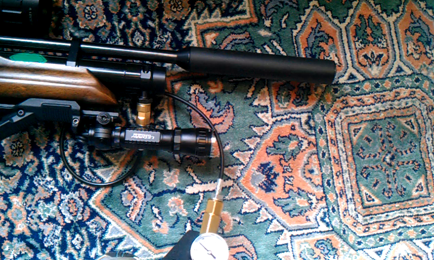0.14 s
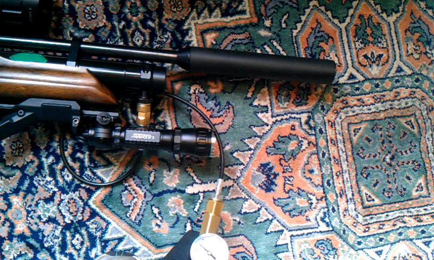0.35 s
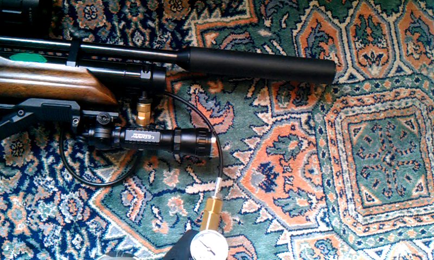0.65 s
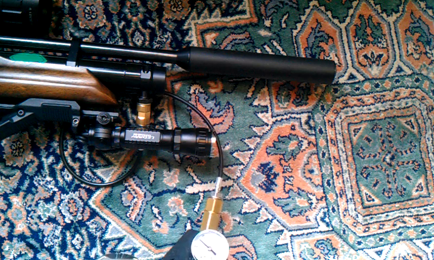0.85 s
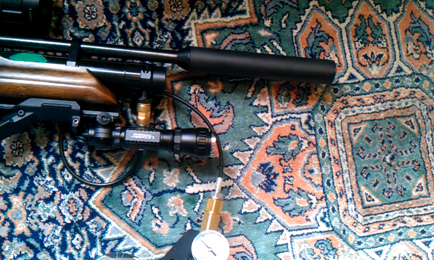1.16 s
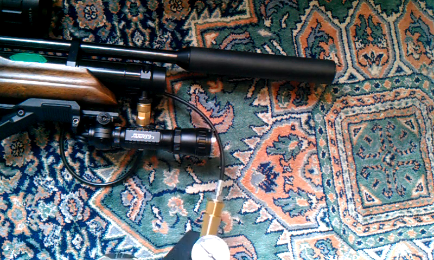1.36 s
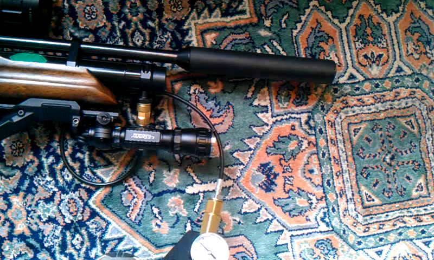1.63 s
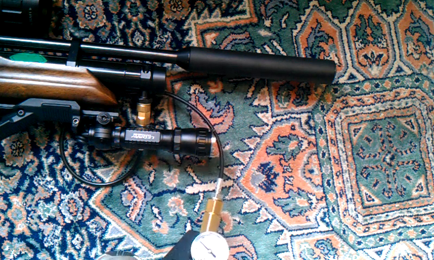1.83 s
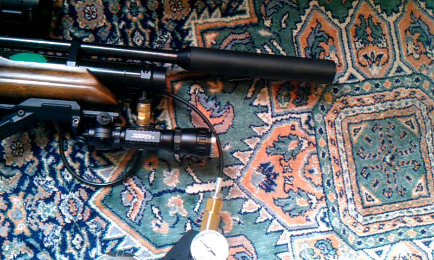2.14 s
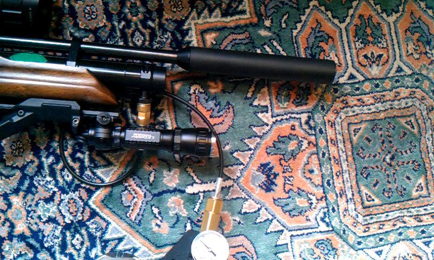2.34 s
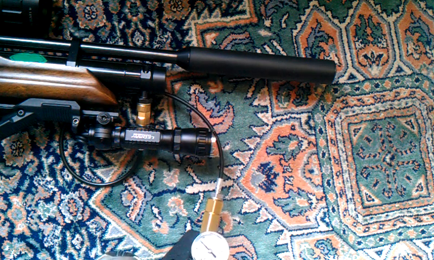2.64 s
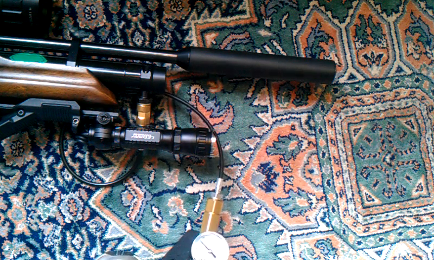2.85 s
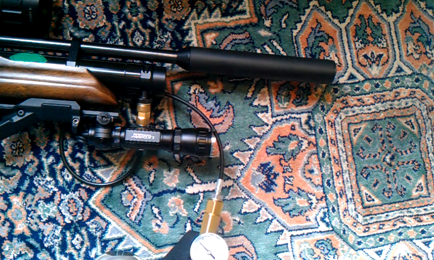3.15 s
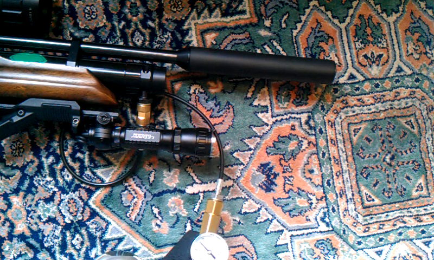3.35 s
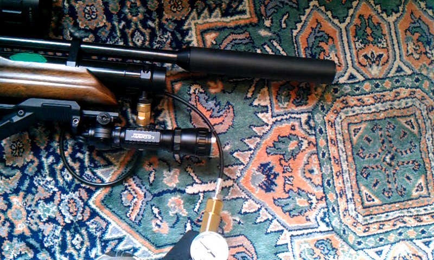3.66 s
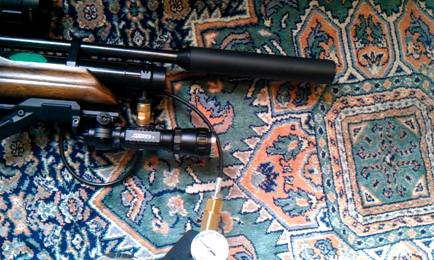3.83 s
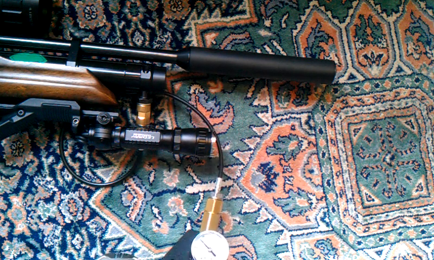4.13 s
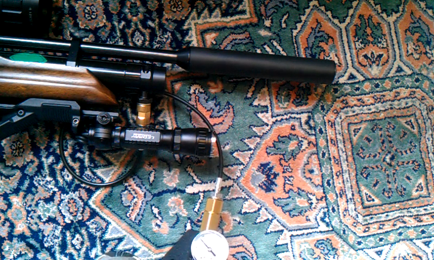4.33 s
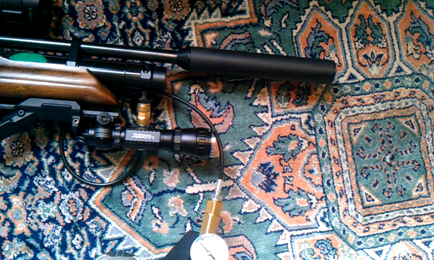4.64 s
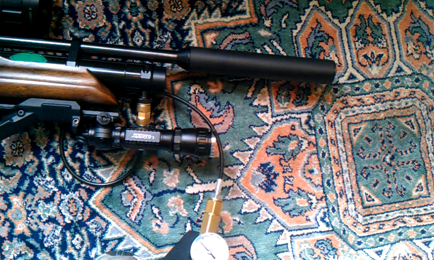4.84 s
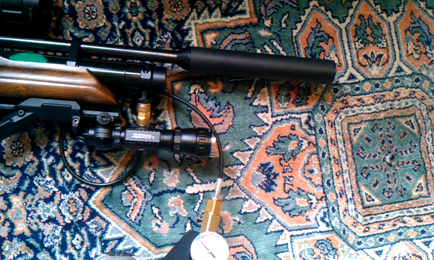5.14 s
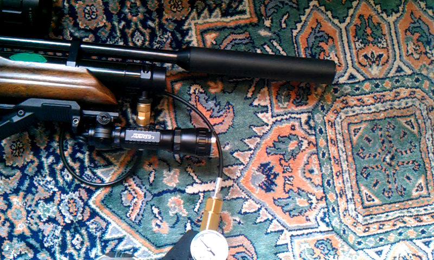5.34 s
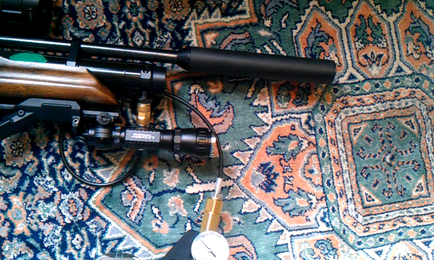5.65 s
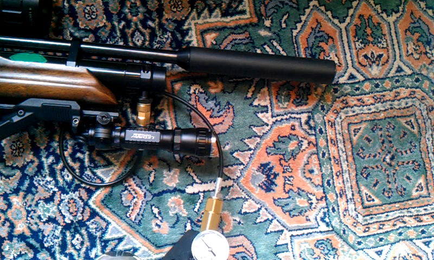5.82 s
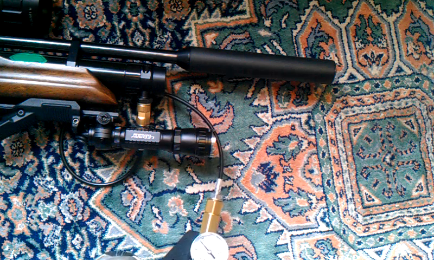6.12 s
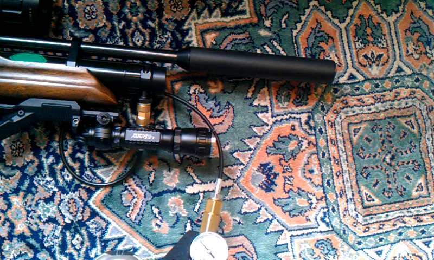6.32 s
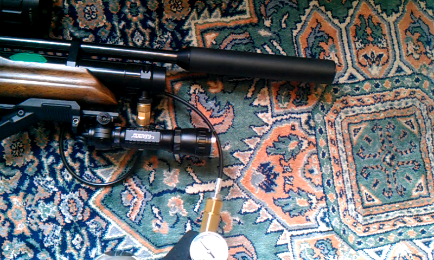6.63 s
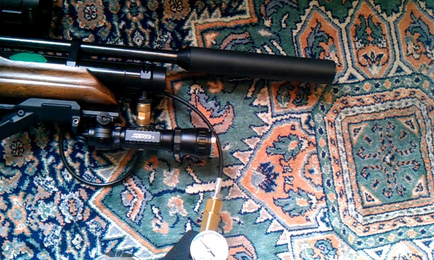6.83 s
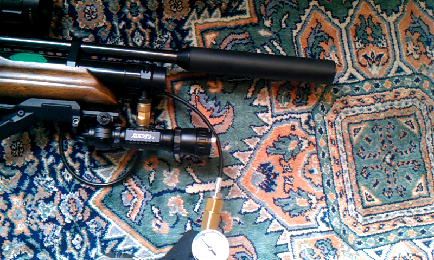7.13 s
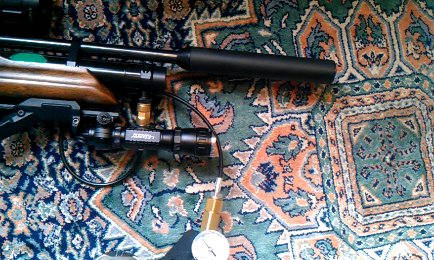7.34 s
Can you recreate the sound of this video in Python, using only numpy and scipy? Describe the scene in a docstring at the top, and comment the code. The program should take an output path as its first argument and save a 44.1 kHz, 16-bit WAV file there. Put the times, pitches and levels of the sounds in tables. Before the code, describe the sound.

Air is already hissing into a hand pump as it begins. The handle taps its top stop, seals rub softly, the valve chirps and squeaks, and the handle lands with a low thud. A sharp pop then launches the next strong hiss. The cycle repeats steadily, with small ticks and grip rustles between. Close microphone, mono, faint short indoor reverberation over a soft room background.

```python
"""Air hisses into a hand pump on an upstroke already under way; the handle then knocks on its top stop.
The pump charges an air rifle on a carpet in a small room, one full stroke every second and a half.
Upstroke: the piston pops free (struck body modes, noise crack) and the intake hisses (flow-shaped noise).
Downstroke: the seals rub (resonant noise), the check valve squeaks (unsteady partials) and leaks air,
the handle thumps home (floor modes). Close and mono, with faint reverberation over a quiet room."""
import sys
import numpy as np
from scipy import signal
from scipy.fft import rfft, irfft
from scipy.io import wavfile

SR = 44100
rng = np.random.default_rng(int(sys.argv[2]) if len(sys.argv) > 2 else 0)


def dump(signal):
    """Clip the signal to [-1, 1] and save it as 16-bit WAV at the path in sys.argv[1]."""
    limited = np.clip(np.atleast_2d(signal).T, -1, 1)
    pcm = np.round(limited * 32767).astype(np.int16)
    wavfile.write(sys.argv[1], SR, pcm)


N = 329868
TIME = np.arange(N) / SR  # s
BINS = np.maximum(np.arange(N // 2 + 1) * SR / N, 1)  # Hz
REST_S = 0.188  # after landing the handle rests at the bottom

# upstrokes: [start t/s, top reached t/s, peak flow level/dB, time to peak t/s, slowing dB per s,
#             time to shut t/s, pop level/dB, knock on the stop level/dB], levels before each source's own trim
UPSTROKES = [ (-0.125, 0.369, -19.5, 0.19, 64, 0.1, -12, -27.5),
             (1.4493, 1.968, -20, .195, 65, 0.055, -13.5, -31.5),
             (3.023, 3.533, -19, 0.21, 92, 0.069, -13.5, -34),
             (4.584, 5.074, -19.5, 0.19, 62.5, 0.055, -15, -52),
             (6.1279, 6.691, -19.5, 0.21, 87.5, 0.066, -14, -34.5), ]
# downstrokes: [valve opens t/s, handle lands t/s, seal rub level/dB, grip friction level/dB,
#               leak on opening level/dB, leak on landing level/dB, thump level/dB], levels likewise
DOWNSTROKES = [ (1.009, 1.254, -54, -54, -41, -49, -34), (2.573, 2.821, -54.5, -58.5, -46, -44.5, -32),
               (4.139, 4.363, -53.5, -58, -48.5, -44, -33), (5.679, 5.901, -55, -59.5, -49.5, -46.5, -34.5),
               (7.257, 7.494, -51.5, -54.5, -46.5, -47, -33), ]


def from_db(db):
    """Decibels to gain."""
    return 10 ** (np.asarray(db) / 20)


def rms_one(x):
    """Scale to unit power."""
    return x / np.sqrt(np.mean(x ** 2) + 1e-20)


def at_hz(points, hz):
    """Read a table on a log-frequency axis."""
    known_hz, values = np.transpose(points)
    return np.interp(np.log(hz), np.log(known_hz), values)


def noise(gains):
    """Unit noise with the given relative gain at each frequency."""
    return rms_one(irfft(rfft(rng.standard_normal(N)) * gains, N))


def coloured(spectrum):
    """Unit noise with a smooth spectrum."""
    return noise(from_db(at_hz(spectrum, BINS)))


def resonant(peaks):
    """Unit noise ringing in a few resonances."""
    power = np.zeros(len(BINS))
    for hz, width, db in peaks:
        detuning = (BINS - hz * hz / BINS) / width
        power += from_db(db) ** 2 / (1 + detuning ** 2)
    return noise(np.sqrt(power))


def drift(rate):
    """Random wander of spread 1, about so many turns a second."""
    return noise(1 / (1 + (BINS / rate) ** 2))


def gate(start, end, fade):
    """One between two times, with short ramps outside them."""
    return np.clip(1 + np.minimum(TIME - start, end - TIME) / fade, 0, 1)


def swell(at, width):
    """A smooth rise and fall around one moment."""
    return np.exp(-np.minimum(((TIME - at) / width) ** 2, 60))


def fall(age, time_constant):
    """One until age zero, then an exponential decay."""
    return np.exp(-np.clip(age / time_constant, 0, 60))


def bursts(rows):
    """Envelope of events (t/s, level/dB, rise t/s, t60/s) that swell and die away."""
    out = np.zeros(N)
    for s, db, rise, t60 in rows:
        near = slice(*np.searchsorted(TIME, [s - .5, s + .5]))
        age = TIME[near] - s
        onset = np.exp(-(np.minimum(age, 0) / rise) ** 2)
        out[near] += from_db(db - 60 * np.maximum(age, 0) / t60) * onset
    return out


def strikes(rows, delay=0):
    """One click for each (t/s, level/dB)."""
    out = np.zeros(N)
    for s, db in rows:
        if 0 <= s + delay < TIME[-1]:
            out[round((s + delay) * SR)] += from_db(db)
    return out


def ring(force, modes):
    """A unit click sets each mode (f/Hz, level/dB, t60/s) ringing at its own level."""
    out = np.zeros(N)
    for hz, db, t60 in modes:
        radius = np.exp(-np.log(1000) / (t60 * SR))
        turn = 2 * np.pi * hz / SR
        feedback = [1, -2 * radius * np.cos(turn), radius * radius]
        out += from_db(db) * signal.lfilter([0, np.sin(turn)], feedback, force + 1e-18)
    return out


def intake_flow(rise_db=22, curve=3.25, round_s=.1):
    """Each pull gathers speed quickly, rounds over its peak and slows until the handle reaches the top."""
    flow = np.zeros(N)
    for start, top, db, peak_s, slowing, shut_s, _, _ in UPSTROKES:
        near = slice(*np.searchsorted(TIME, [start, top + 2 * shut_s]))
        age = TIME[near] - start
        rising = rise_db * np.maximum(1 - age / peak_s, 0) ** curve
        easing = slowing * (np.hypot(np.maximum(age - peak_s, 0), round_s) - round_s)
        flow[near] += from_db(db - rising - easing)
    return flow


def intake(full_flow_db=-24, jet_db=-1.0, flutter_db=0.2, wander_db=.35, wander_rate=40,
           passage_db=-11, passage_growth=0.62, seat_db=-21, seat_growth=0.51,
           lift_db=-15, lift_s=0.038, treble_lag_s=0.026):
    """Turbulent hiss that brightens with the flow; at low flow the passage and the valve seat ring through."""
    # hiss at full flow: [f/Hz, relative level/dB per Hz]
    hiss = [(120, -64), (270, -24.5), (500, -19.5), (900, -14), (1400, -10), (2200, -9), (3150, -7),
            (3700, -8), (4700, -4), (6000, -4.5), (7900, -2), (10300, -5.5), (11600, -11), (16000, -15.5)]
    # how steeply each pitch grows with the flow: [f/Hz, dB per dB], floored at .05 below
    growth_rates = [(200, -2.1), (600, 0), (1300, 0.58), (3000, 1.18), (5500, 1.35), (7600, 1.27),
                    (10000, 1.09), (15000, 1.5)]
    # resonances of the intake passage: [f/Hz, width f/Hz, relative level/dB]
    passage_peaks = [(1350, 48, -17), (1716, 23, 9.5), (2570, 160, -13), (2920, 360, 2), (4500, 1000, 2),
                     (7260, 430, 8.5), (9900, 1000, -28), (14500, 1500, -29)]
    # ring of the intake valve's seat: [f/Hz, width f/Hz, relative level/dB]
    seat_peaks = [(7800, 630, 14), (8000, 480, -18)]
    flow = intake_flow() / from_db(full_flow_db)
    jet_spectrum = rfft(coloured(hiss))
    known_hz = [row[0] for row in growth_rates]
    jet = np.zeros(N)
    for (hz, growth), share in zip(growth_rates, np.eye(len(growth_rates))):
        band = irfft(jet_spectrum * np.interp(np.log(BINS), np.log(known_hz), share), N)
        lag = treble_lag_s * (hz / known_hz[-1]) ** 2  # the treble builds a little late
        late = np.interp(TIME - lag, TIME, flow)
        jet += band * late ** max(growth, .05) * from_db(wander_db * drift(wander_rate))
    passage = from_db(passage_db) * resonant(passage_peaks) * flow ** passage_growth
    # the seat rings most just after the valve lifts
    lifting = bursts([(start + lift_s, lift_db, lift_s, .3) for start, *_ in UPSTROKES])
    seat = (from_db(seat_db) + lifting) * resonant(seat_peaks) * flow ** seat_growth
    valve_open = np.zeros(N)
    for start, top, _, _, _, shut_s, _, _ in UPSTROKES:
        valve_open += gate(start, top - .008, shut_s) ** 2
    # small eddies make the whole jet flutter
    level = from_db(full_flow_db + flutter_db * drift(200))
    return valve_open * level * (from_db(jet_db) * jet + passage + seat)


def valve_note(notes, overtones_db, jitter, shimmer_db, rasp):
    """Reed-like notes (gate, pitch, partial gains); added upper partials follow the last, higher ones fray more."""
    pitch = sum((on > 0) * hz for on, hz, _ in notes) * (1 + jitter * drift(200))
    phase = 2 * np.pi * np.cumsum(pitch) / SR
    gains = list(sum(on * np.array(partials) for on, _, partials in notes))
    gains += [gains[-1] * from_db(db) for db in overtones_db]
    note = np.zeros(N)
    for k, gain in enumerate(gains, 1):
        frayed_phase = k * phase + rasp * k * k * drift(67)
        note += gain * from_db(shimmer_db * drift(38)) * np.sin(frayed_phase)
    return np.sqrt(2) * note


def chirps(attack_s=0.0048, bend=0.84, upper_fade=0.53):
    """The pitch climbs as the valve lifts; each higher partial fades more slowly."""
    # chirp as the valve cracks open, one row per downstroke:
    # [length t/s, from f/Hz, to f/Hz, fade of partial 1 dB per s, starting level/dB of partials 1, 2, 3]
    chirp_rows = [ (.054, 1840, 2090, 90, -40.5, -37, -39.5), (0.048, 1865, 2120, 324, -31.5, -38.5, -41.5),
                  (.036, 1890, 2035, 260, -34.5, -40, -37.5), (.027, 1890, 1980, 450, -35, -42, -41),
                  (0.039, 1890, 2050, 560, -36, -42.5, -42.5), ]
    notes = []
    for (opens, *_), (length, low_hz, high_hz, fade, *levels) in zip(DOWNSTROKES, chirp_rows):
        way = np.clip((TIME - opens) / length, 0, 1)
        partials = [from_db(db - fade * upper_fade ** k * length * way) for k, db in enumerate(levels)]
        on = gate(opens + attack_s / 2, opens + length, attack_s)
        notes.append((on, low_hz + (high_hz - low_hz) * way ** bend, partials))
    return notes


def buzzes(hold_db=-59, opening_s=0.039, fundamental_s=0.026, third_s=0.1):
    """The octave speaks first, gives way to the fundamental in the sag and swells again afterwards."""
    # pitch of the open valve's low note, which sags and recovers; one curve per downstroke: [t/s, f/Hz]
    pitch_curves = [
        [(1.02, 927), (1.048, 934), (1.068, 833), (1.086, 827.6), (1.11, 876), (1.25, 909)],
        [(2.61, 862), (2.674, 834), (2.688, 873), (2.778, 900), (2.792, 924), (2.82, 903)],
        [(4.172, 854), (4.2, 824.1), (4.218, 848), (4.226, 843), (4.29, 905), (4.36, 912)],
        [(5.69, 870), (5.706, 844.3), (5.744, 842), (5.766, 889), (5.894, 923), (5.9, 934)],
        [(7.305, 911), (7.369, 888.6), (7.383, 848), (7.427, 842), (7.441, 900), (7.48, 905)],
    ]
    # how that note speaks, one row per downstroke: [opening level/dB, time to fundamental's swell t/s,
    # its level/dB, time to octave's swell t/s, its width t/s, its level/dB, third partial level/dB]
    buzz_rows = [ (-37, 0.087, -50, 0.17, 0.051, -38.5, -47), (-42, .1, -48.5, 0.14, 0.089, -42.5, -49),
                 (-43, 0.076, -47, .16, 0.031, -40, -54), (-42.5, 0.053, -44, 0.13, 0.061, -39, -46.5),
                 (-62, 0.069, -50, .105, 0.019, -46, -52), ]
    notes, hold = [], from_db(hold_db)
    for (opens, lands, *_), curve, row in zip(DOWNSTROKES, pitch_curves, buzz_rows):
        opening_db, first_at, first_db, octave_at, octave_s, octave_db, third_db = row
        sag = swell(opens + first_at, fundamental_s)
        octave = from_db(opening_db) * swell(opens + opening_s / 2, opening_s)
        octave += from_db(octave_db) * swell(opens + octave_at, octave_s)
        third = from_db(third_db) * swell(opens + octave_at, third_s)
        partials = [hold + from_db(first_db) * sag, hold + octave * (1 - sag), hold + third]
        notes.append((gate(opens + .008, lands, .008), np.interp(TIME, *np.transpose(curve)), partials))
    return notes


def sings(sharp_hz=30, settle_s=0.01877, octave_fade_db=4):
    """A nearly steady note that starts a little sharp and dips or swells midway."""
    # high note of the open valve: [start t/s, end t/s, f/Hz, level/dB of partials 1, 2 before the dip,
    #                               midway dip of partial 2 in dB (negative: a swell; partial 1 takes half)]
    sing_rows = [(1.066, 1.25, 2062, -55, -50, 6), (2.631, 2.81, 2095, -55, -41, 23),
                 (4.186, 4.35, 2110, -58, -48.5, 5), (5.716, 5.885, 2112, -62, -51, 5),
                 (7.399, 7.468, 2110, -50.5, -54, -6.5)]
    notes = []
    for start, end, hz, first_db, second_db, dip_db in sing_rows:
        way = np.clip((TIME - start) / (end - start), 0, 1)
        dip = dip_db * np.sin(np.pi * way)
        pitch = hz + sharp_hz * fall(TIME - start, settle_s)
        partials = [from_db(first_db - dip / 2), from_db(second_db - dip - octave_fade_db * way)]
        notes.append((gate(start, end, .003), pitch, partials))
    return notes


def whistle(jitter=0.0149):
    """Thin tones that swell, slide ever faster and fade."""
    # thin whistles of the valve: [start t/s, end t/s, from f/Hz, to f/Hz, level/dB at the height of the swell]
    whistle_rows = [(1.012, 1.036, 4700, 5070, -40), (1.044, 1.059, 6110, 6400, -29),
                    (1.069, 1.1, 2440, 2640, -35), (1.095, 1.133, 2760, 3400, -44),
                    (1.262, 1.281, 2070, 2300, -41.5), (2.693, 2.73, 3550, 3700, -45),
                    (4.195, 4.219, 2370, 2654, -41), (4.214, 4.272, 2750, 3690, -50),
                    (4.37, 4.415, 2130, 2200, -48), (5.69, 5.767, 3390, 3240, -48),
                    (5.734, 5.783, 2470, 3245, -46), (5.912, 5.943, 2135, 2170, -44),
                    (7.27, 7.318, 2160, 2570, -44), (7.279, 7.299, 6300, 6580, -30.5),
                    (7.294, 7.316, 4170, 4290, -30.5), (7.382, 7.442, 3380, 3500, -51),
                    (7.385, 7.444, 2580, 2650, -64)]
    out, wobble = np.zeros(N), 1 + jitter * drift(234)
    for start, end, low_hz, high_hz, db in whistle_rows:
        way = np.clip((TIME - start) / (end - start), 0, 1)
        pitch = (low_hz + (high_hz - low_hz) * way ** 2) * wobble
        envelope = from_db(db) * np.sin(np.pi * way ** 1.25)
        out += envelope * np.sin(2 * np.pi * np.cumsum(pitch) / SR)
    return np.sqrt(2) * out


def leak_flow(hold_db=-57.5, settle_s=0.066, swell_s=0.043, linger_s=0.016, release_s=0.018):
    """Air spurts as the valve opens, settles, swells toward the landing and dies."""
    flow = np.zeros(N)
    for opens, lands, _, _, open_db, land_db, _ in DOWNSTROKES:
        opening = from_db(open_db) * fall(TIME - opens, settle_s)
        landing = from_db(land_db) * fall(lands - TIME, swell_s)
        dying = fall(TIME - lands - linger_s, release_s)
        flow += (from_db(hold_db) + opening + landing) * gate(opens, lands + REST_S, 0.0015) * dying
    return flow


def check_valve(leak_db=0, coupling_db=0, sputter_db=2.0):
    """Compressed air forces the valve open: a chirp, two squeaking notes and a leak ringing in the coupling."""
    # air squeezing through the valve: [f/Hz, relative level/dB per Hz]
    leak_colour = [(150, -7), (500, 1.5), (1300, 8), (2000, -19), (3000, -2), (4300, 16), (5200, -16),
                   (6500, 9), (8500, 7), (11000, -3), (16000, -10)]
    # resonances of the valve and hose coupling: [f/Hz, width f/Hz, relative level/dB]
    coupling = [(915, 190, -12), (1970, 100, 12.5), (2780, 150, 11.5), (3640, 210, -5), (4220, 93, 0.5),
                (6150, 640, 6), (7440, 700, 0.5)]
    chirp = valve_note(chirps(), overtones_db=[-9], jitter=0.0078, shimmer_db=4.0, rasp=0.21)
    buzz = valve_note(buzzes(), overtones_db=[-8.0, -16, -16.5, -14], jitter=0.0023, shimmer_db=3.0, rasp=0.041)
    sing = valve_note(sings(), overtones_db=[-9], jitter=0.0024, shimmer_db=6.5, rasp=.07)
    air = from_db(leak_db) * coloured(leak_colour) + from_db(coupling_db) * resonant(coupling)
    leak = leak_flow() * air * from_db(sputter_db * drift(130))
    return chirp + buzz + sing + whistle() + leak


def pops(crack_db=1, crack_lag=0.0017, tail_db=-19, recoil_db=2, recoil_lag=0.00097, push_db=-1):
    """The piston lets go with a push and a recoil of the body, then a crack of inrushing air."""
    # modes of the pump's body: [f/Hz, level/dB, t60/s]
    body = [(266.6, -18, 0.069), (362, -15, 0.021), (450, -15, 0.013), (638, -20, 0.025)]
    # crack of the pop: [f/Hz, relative level/dB per Hz]
    crack_colour = [(800, -11.5), (2500, -1), (3500, -7), (4800, 1.5), (6000, -0.5), (7600, 6.5),
                    (9500, -7.5), (11000, -8), (16000, -14)]
    hits = [(start, db) for start, *_, db, _ in UPSTROKES]
    force = strikes(hits) - from_db(recoil_db) * strikes(hits, delay=recoil_lag)
    crack = bursts([(s + crack_lag, db + crack_db, .0007, .008) for s, db in hits])
    tail = bursts([(s + crack_lag, db + tail_db, .0007, .06) for s, db in hits])
    return from_db(push_db) * ring(force, body) + (crack + tail) * coloured(crack_colour)


def thumps(bounce_db=-1, bounce_lag=.0205, scuff_db=-28, lean_db=-89, lean_s=0.13):
    """The handle lands, the foot rocks once and the floor booms; the slowest motion makes no sound."""
    # modes of the floor under the pump's foot: [f/Hz, level/dB, t60/s]
    floor = [(36, -3.5, 0.32), (44.2, -15, 0.26), (71.1, -5.5, 0.43), (109.2, -6.5, 0.097),
             (147.6, -3.5, 0.075), (202, -3.5, 0.07), (296, -11, 0.067), (478, -8, 0.05),
             (540, -17.5, 0.069)]
    hits = [(lands, db) for _, lands, *_, db in DOWNSTROKES]
    landing = strikes(hits) + from_db(bounce_db) * strikes(hits, delay=bounce_lag)
    scuff = bursts([(s, db, .002, .15) for s, db in hits]) * rng.standard_normal(N)
    # the floor stirs as weight comes onto the handle
    leaning = bursts([(top + lean_s, lean_db, .06, .5) for _, top, *_ in UPSTROKES])
    leaning *= rng.standard_normal(N)
    boom = ring(leaning + landing + from_db(scuff_db) * scuff, floor)
    return signal.sosfilt(signal.butter(3, 27, "high", fs=SR, output="sos"), boom)


def top_stops(knock_db=-5, rattle_db=-26, rattle_t60=0.11, low_cut_hz=120):
    """The handle knocks on its stop and rattles briefly, with little weight behind it."""
    # modes of the handle and its shaft: [f/Hz, level/dB, t60/s]
    handle = [(171.6, -20.5, 0.25), (300, -14, 0.15), (353, -15, 0.069), (385, -9.5, 0.058),
              (502, -2, 0.023), (620, -4.5, 0.019), (1000, -5.5, 0.0084)]
    hits = [(top, db) for _, top, *_, db in UPSTROKES]
    rattle = bursts([(s, db, .002, rattle_t60) for s, db in hits]) * rng.standard_normal(N)
    knock = ring(from_db(knock_db) * strikes(hits) + from_db(rattle_db) * rattle, handle)
    return signal.sosfilt(signal.butter(1, low_cut_hz, "high", fs=SR, output="sos"), knock)


def shaft(push_s=0.6, rub_rise_db_per_s=34, rub_rest_db=-66, idle_db=-68, rest_db=-62,
          grain_db=2.0, friction_db=2, grip_ring_db=-5, stick_db=2.0, uneven_db=0.6):
    """The seals make the tube sing more as pressure builds; the grip scuffs under full load; parts tick."""
    # ring of the steel tube: [f/Hz, width f/Hz, relative level/dB]
    tube = [(1940, 120, -13), (2800, 180, -14), (4440, 110, -4), (5780, 56, 2), (5900, 93, -1),
            (6420, 430, -7.5), (9700, 3500, -14.5)]
    # dull friction of shaft and grip: [f/Hz, relative level/dB per Hz]
    friction_colour = [(60, -10), (150, 4), (240, 5.5), (520, 2), (750, 4.5), (1300, 3), (1900, 3.5),
                       (3000, -1), (6000, 1), (16000, -7)]
    # resonances of the grip: [f/Hz, width f/Hz, relative level/dB]
    grip_peaks = [(162, 60, -7), (560, 75, -1.5)]
    # hands shifting on the grip: [t/s, level/dB, rise t/s, t60/s]
    rustle_rows = [(0.544, -57, 0.055, 0.25), (2.834, -44.5, 0.034, 0.19), (3.72, -68.5, 0.016, 0.075),
                   (4.385, -41, 0.073, 0.23), (5.32, -58.5, 0.13, 0.43), (5.926, -47, 0.04, 0.34),
                   (7.15, -58, .2, 0.52)]
    # rustle of hands on the grip: [f/Hz, relative level/dB per Hz]
    rustle_colour = [(60, -11), (300, 3.5), (700, 4.5), (1400, -2), (2500, -5), (6000, -10), (16000, -24)]
    # ticks of valve and shaft: [t/s, level/dB, rise t/s, t60/s]
    tick_rows = [(0.673, -47.5, 0.00048, 0.011), (0.882, -48.5, 0.011, 0.099), (1.304, -44, 0.0022, 0.079),
                 (2.124, -51.5, 0.00081, 0.035), (2.163, -48, 0.0019, .05), (2.835, -35.5, 0.0041, 0.056),
                 (2.880, -39, 0.0012, .07), (3.867, -40, 0.0025, 0.048), (4.376, -34, 0.0048, 0.036),
                 (4.438, -37.5, 0.0018, 0.085), (5.627, -48.5, 0.0016, 0.048), (5.915, -36, 0.0035, 0.05),
                 (5.985, -43, 0.0021, 0.092)]
    # colour of the ticks: [f/Hz, relative level/dB per Hz]
    tick_colour = [(300, -8), (1200, -3.5), (2900, 8.5), (4000, -4), (5800, 9), (7600, 8.5), (10000, -7),
                   (16000, -9)]
    seals, grip = np.zeros((2, N))
    for opens, lands, rub_db, grip_db, *_ in DOWNSTROKES:
        pushing = gate(opens - push_s, opens, 0.0057)  # the push starts well before the valve opens
        loaded = gate(opens + 0.036, lands, 0.052)
        resting = gate(lands, lands + REST_S, .01)
        seals += pushing * from_db(rub_db - rub_rise_db_per_s * np.maximum(opens - TIME, 0))
        seals += resting * from_db(rub_rest_db)
        grip += pushing * from_db(idle_db) + loaded * from_db(grip_db) + resting * from_db(rest_db)
    rub = seals * resonant(tube) * from_db(grain_db * drift(91) + uneven_db * drift(8.2))
    scuffing = coloured(friction_colour) + from_db(grip_ring_db) * resonant(grip_peaks)
    friction = grip * scuffing * from_db(friction_db + stick_db * drift(80))
    rustle = bursts(rustle_rows) * coloured(rustle_colour) * from_db(stick_db * drift(40))
    ticks = bursts(tick_rows) * coloured(tick_colour)
    return rub + friction + rustle + ticks


def room(x, wet_db=-20, t60=0.21, low_hz=350, wall_hz=5000):
    """Faint, short reverberation of a carpeted room: decaying, band-limited noise as its echo."""
    age = TIME[:SR // 2]
    tail = rng.standard_normal(len(age)) * np.exp(-np.log(1000) * age / t60) * (age > .004)
    tail = signal.sosfilt(signal.butter(1, [low_hz, wall_hz], "band", fs=SR, output="sos"), tail)
    return x + from_db(wet_db) * signal.fftconvolve(x, tail / np.linalg.norm(tail))[:N]


def quiet_room(level_db=-63, waver_db=1.0):
    """Background of the room: soft coloured noise whose level wavers slightly."""
    # quiet of the room: [f/Hz, relative level/dB per Hz]
    quiet_colour = [(15, -60), (25, 4), (58, -6.5), (161, -10.5), (531, -4), (936, -15), (1330, -10.5),
                    (3340, -13), (4370, -10.5), (5280, -13), (5880, -9), (7110, -14), (16000, -20)]
    return coloured(quiet_colour) * from_db(level_db + waver_db * drift(18.0))


def scene():
    """The pump in its room, the same in both channels."""
    pump = intake() + check_valve() + pops() + top_stops() + thumps() + shaft()
    return np.tile(room(pump) + quiet_room(), (2, 1))


def record(dry, overload=.45, cutoff_hz=15900):
    """The loudest peaks are rounded and the top is cut steeply."""
    rounded = dry / (1 + (dry / overload) ** 4) ** (1 / 4)
    return signal.sosfilt(signal.ellip(12, .1, 80, cutoff_hz, fs=SR, output="sos"), rounded)


dry = scene()
out = record(dry)
dump(out)
```